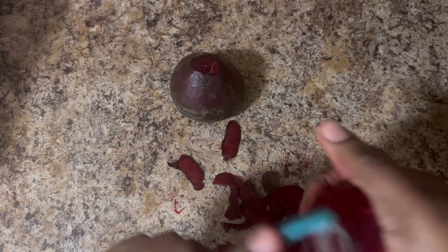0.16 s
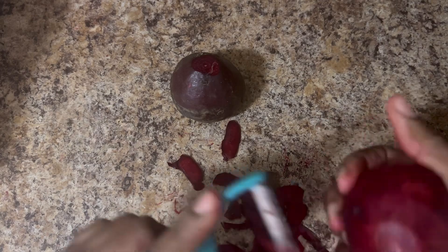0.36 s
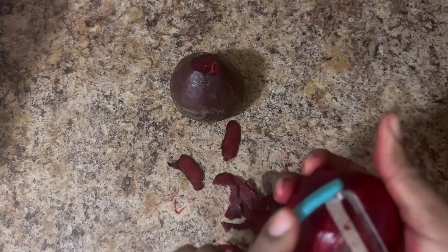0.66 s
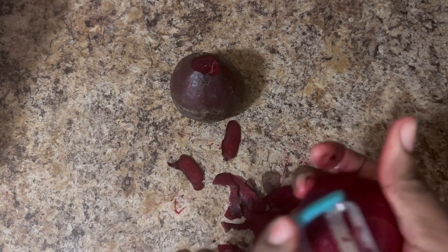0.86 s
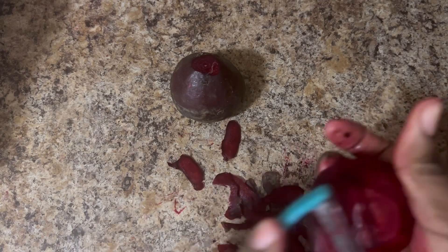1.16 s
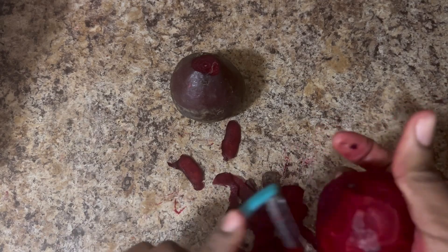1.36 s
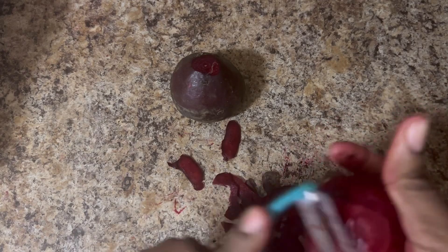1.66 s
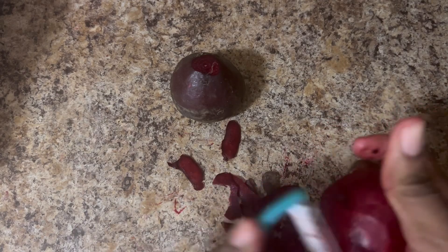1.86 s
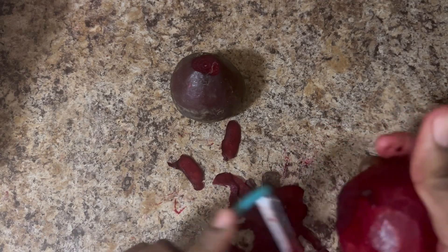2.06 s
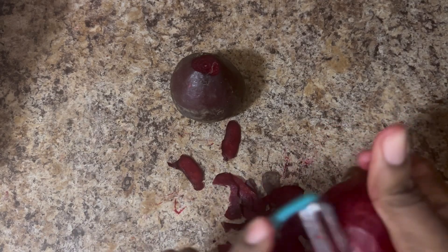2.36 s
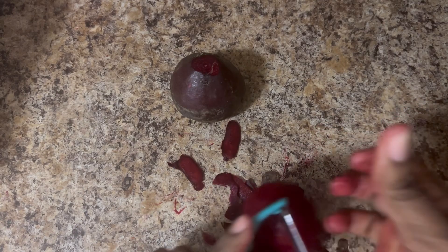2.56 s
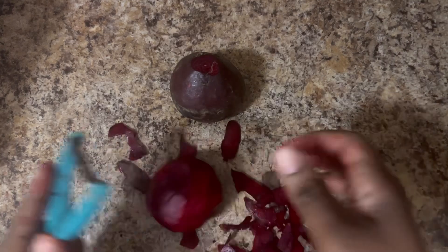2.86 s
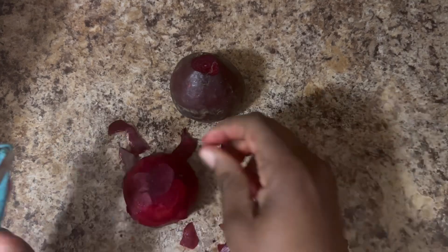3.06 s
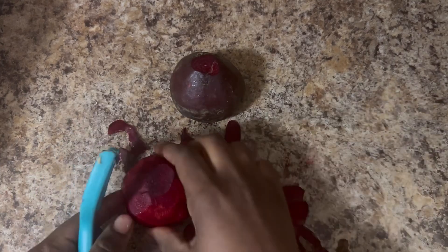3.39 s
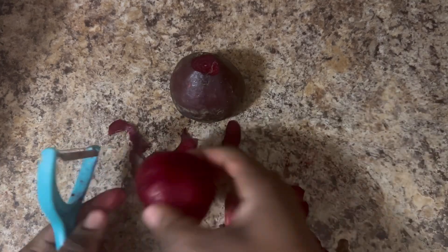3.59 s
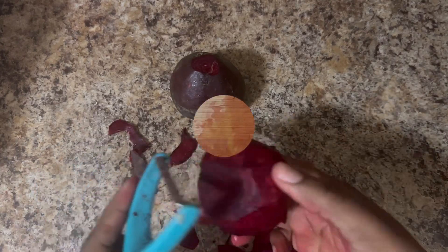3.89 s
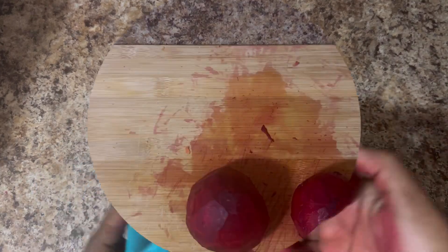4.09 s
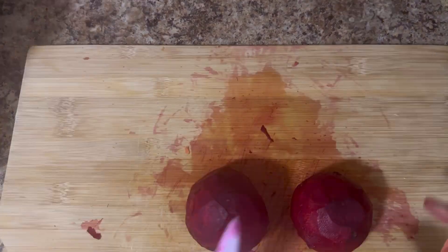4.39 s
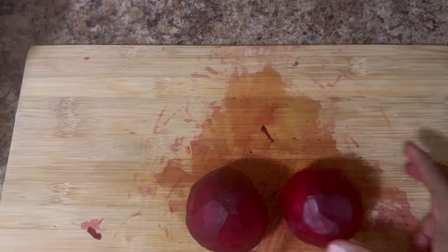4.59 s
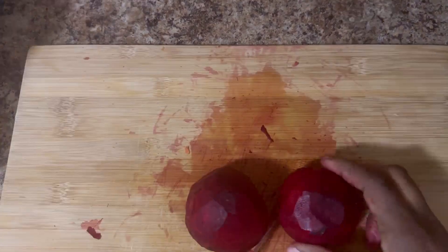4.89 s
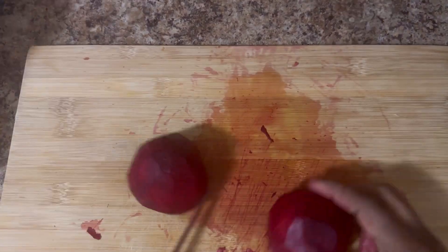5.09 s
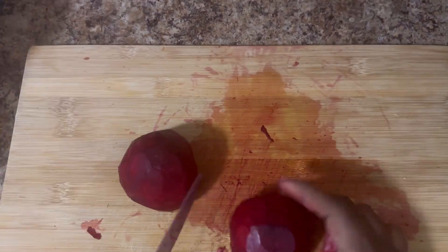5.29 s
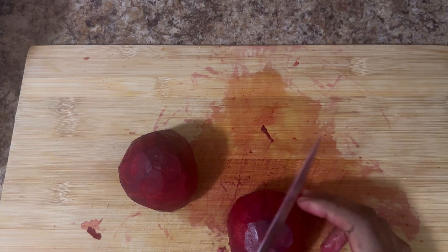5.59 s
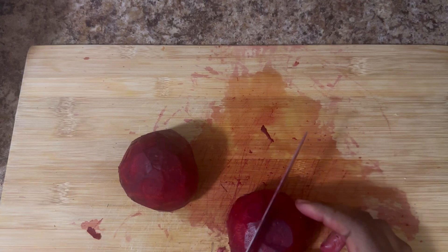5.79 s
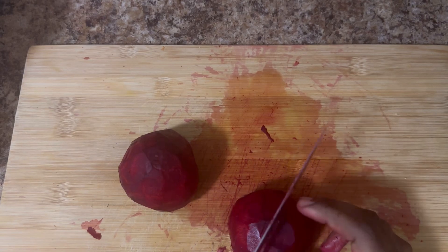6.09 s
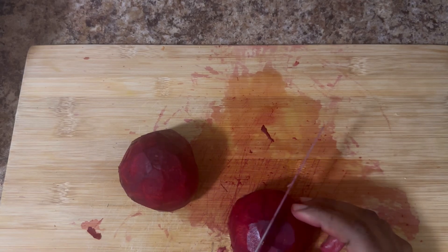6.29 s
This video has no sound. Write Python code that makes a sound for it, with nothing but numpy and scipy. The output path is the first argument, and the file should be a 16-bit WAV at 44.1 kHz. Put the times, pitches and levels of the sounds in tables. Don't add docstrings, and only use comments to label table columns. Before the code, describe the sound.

A peeler clicks and rasps through a raw beetroot, the root thumps and rolls on a stone counter, then a knife knocks on a wooden board.

```python
import sys
import numpy as np
from scipy import signal
from scipy.fft import rfft, irfft, next_fast_len
from scipy.io import wavfile
from scipy.ndimage import uniform_filter1d, map_coordinates

SR = 44100
rng = np.random.default_rng(int(sys.argv[2]) if len(sys.argv) > 2 else 0)


def linear_from_db(decibels):
    return 10 ** (np.asarray(decibels, float) / 20)


def master_out(mix):
    frames = np.transpose(np.atleast_2d(mix))
    ceiling = np.clip(frames, -1, 1)
    pcm = np.round(ceiling * 32767).astype(np.int16)
    wavfile.write(sys.argv[1], SR, pcm)


N = 284445
TIME = np.arange(N) / SR
AIR_HZ = 11040

# f/Hz, width/Hz, level/dB
BLADE = [(3132, 47, 8.5), (4220, 130, 5.5), (5700, 220, 8.5), (6220, 540, 5), (7100, 110, 1.5),
         (7740, 1100, 9.5)]
# f/Hz, level/dB
FAR_SIDE = [(60, -32.5), (110, -64), (200, -27.5), (380, -6.5), (700, -1), (1290, -34), (2380, -4.5),
            (4400, -4.5), (8120, -5), (15000, 11)]


def peeling():
    # bite t/s, glide before it/s, cut length/s, cut level/dB, glide level/dB
    strokes = [
        (0.177, .064, 0.026, -35.5, -69),
        (0.901, .035, 0.045, -33.5, -64),
        (1.287, 0.051, 0.07, -38, -56.5),
        (1.668, 0.029, 0.043, -35, -48),
        (1.988, 0.045, 0.038, -35.5, -56),
        (2.364, 0.054, 0.023, -34, -52.5),
        (2.438, 0.03, 0.019, -52, -69),
    ]
    # f/Hz, level/dB per Hz
    skin = [(350, -31), (600, -2.5), (905, -10), (1950, -11.5), (2740, -5.5), (4500, -9), (6300, -6.5),
            (7500, -10.5), (9600, -11), (10400, -21), (11000, -33), (13400, -26), (14300, -15),
            (15500, -10.5)]
    return gain([stroke(*row) for row in strokes]) * grit(skin, BLADE, rough_db=1.5, rate_hz=900, patch_db=3.5)


def stroke(bite_s, glide_s, cut_s, cut_db, glide_db):
    land_db, settle_s = -1, 0.018
    rise_s, bite_db, crest, leave_db = 0.0058, -4.5, 0.52, -7
    lift_s, after_db, after_s = 0.0088, -29.5, 0.07
    land_s, end_s = bite_s - glide_s, bite_s + cut_s
    return [(land_s, glide_db + land_db),
            (land_s + settle_s, glide_db),
            (bite_s - rise_s, glide_db),
            (bite_s, cut_db + bite_db),
            (bite_s + crest * cut_s, cut_db),
            (end_s, cut_db + leave_db),
            (end_s + lift_s, cut_db + after_db),
            (end_s + after_s, cut_db + after_db - 5)]


def clicks():
    # handle knock/dB, steel edge/dB, first touch/dB
    contacts = [(0.1014, -20.5, -11, 0.5, -26), (0.5901, -61, 24.5, -15, -32), (1.1075, -54, 4, -4, -28),
                (1.2069, -25.5, -8, 6, -20.5), (1.5594, -69, 23, -13, -35), (1.6146, -19, -7, 2, -21),
                (1.944, -21.5, -8, 4.5, -29), (2.311, -18.5, -9, 0.5, -31),
                (2.4404, -60.5, -9.5, 18.5, -31), (2.5033, -47, -17, -9, -28), (2.5974, -34, -12, 5.5, -31),
                (2.7185, -46.5, 18.5, -2, -31.5), (4.7651, -38, 0, 3, -18), (4.828, -58, 10, -3, -28),
                (5.8041, -51.5, 11, 3, -23), (6.1554, -52, 5, 8.5, -37), (6.344, -48, 4, 0, -28)]
    # f/Hz, level/dB per Hz
    snap_spectrum = [(710, -53), (1200, -11.5), (2920, -1), (3800, -4), (4380, 7), (5100, 0.5), (5820, 4.5),
                     (9330, -2), (10900, -16), (14900, -4), (16500, -25), (17000, -72.5)]
    air_db, air_t60_s = -15.5, 0.017
    force = np.zeros((4, N))
    t = TIME[:SR // 10]
    late = np.maximum(t - 0.006, 0)
    crack_and_chatter = linear_from_db(-60 * late / 0.0073) + linear_from_db(-10.5 - 60 * late / 0.047)
    blow = (1 - np.exp(-(late / 0.0012) ** 2)) * crack_and_chatter
    air_blow = (1 - np.exp(-(late / 0.00015) ** 2)) * linear_from_db(-60 * late / air_t60_s)
    blow = np.array([blow, blow, blow, air_blow])
    touch = t / 0.0048 * linear_from_db(-60 * late / 0.0016) * linear_from_db(np.array([[9], [-1], [-13], [-18]]))

    chips = rng.standard_normal((len(contacts), 4, len(t)))
    chips = chips + 7 * np.exp(-((late - 0.001) * SR) ** 2)
    chips = chips + 9 * np.exp(-((late - 0.0004) * SR) ** 2)
    for (s, db, knock_db, edge_db, touch_db), grain in zip(contacts, chips):
        at = round((s - 0.0064) * SR)
        level = linear_from_db(db + np.array([[knock_db], [0], [edge_db], [0]]))
        force[:, at:at + len(t)] = level * (blow + linear_from_db(touch_db) * touch) * grain

    snap = colour(snap_spectrum, BLADE, share=0.38)
    upper = lambda f: 1 / (1 + (4000 / (f + 1)) ** 12)
    air = lambda f: 1 / (1 + (AIR_HZ / (f + 1)) ** 24)
    parts = [colour([(200, -16), (400, 1.5), (650, 10), (1200, -10.5), (2200, -31.0)]),
             lambda f: snap(f) * (1 - upper(f)),
             lambda f: snap(f) * upper(f) * (1 - air(f)),
             lambda f: snap(f) * air(f)]
    return sum(linear_from_db(db) * filtered(x, causal(part)) / unit_gain(part)
               for x, part, db in zip(force, parts, (3, 1.5, 1.4, air_db)))


def root_on_counter():
    # t/s, root thump/dB, slab ring/dB, step to each higher mode group/dB, thump f/Hz
    bounces = [(2.5978, -1, -5, -1, 120.3), (2.627, -11, -16, -18, 97), (2.675, -14, -20.5, -10, 103),
               (2.712, -31, -32, 3.5, 111), (2.72, -3.5, -11.5, -5, 111), (2.756, -3.5, -17.5, 0.5, 94),
               (2.77, -3.5, -10.5, -4, 95.6), (2.794, -7.5, -30, 2, 100), (2.812, -22, -19.5, -9.5, 125),
               (2.892, -4.5, -10.5, -3.5, 124.7), (2.924, -25.5, -14.5, -8.5, 96),
               (2.954, -8, -18, -5.5, 131), (2.963, -8.5, -22, -8, 92.4), (2.992, -9.5, -14, -9, 102.4),
               (3.014, -10, -29.5, 1.5, 94.8), (3.034, -33, -30, -21, 98), (3.081, -40, -30, -16, 103),
               (3.119, -44, -42, -6, 87.5), (3.44, -27, -41, -6, 117), (3.479, -55, -40, -4, 129)]
    # f/Hz, level/dB, t60/s, group (rounded: 0 thump, 1 ring, 2 and 3 a step up each)
    counter = [(56, -4, 0.24, 1.5), (97, -6, 0.16, 1), (179.7, 0.5, 0.17, 1), (199, -4.5, 0.13, 2),
               (252, -11, 0.14, 2), (299.5, 0.5, 0.1, 2), (321, -4, 0.036, 2), (423, 4.5, 0.042, 3),
               (501, -7.5, 0.052, 3), (604, -11.5, 0.036, 3), (825, -30.5, 0.062, 3)]
    return linear_from_db(3.0) * thuds(bounces, counter, soft_s=0.0024, low_t60_s=0.11, lag_s=-0.00342, spread_s=0.003)


def knocks_on_board():
    # t/s, low thump/dB, board ring/dB, step to each higher mode
    # group/dB, thump f/Hz
    knocks = [(1.31, -33, -66, -15, 60), (1.6, -30, -67, -5, 55.4), (4.533, -53, -31, -6.5, 59.2),
              (4.547, -22.5, -29, -3, 66), (4.575, -38, -36.5, 1, 63.6), (4.609, -26.5, -35.5, -2, 113),
              (4.673, -22, -30.5, -6, 99), (4.769, -27, -62, 2, 92), (4.948, -22, -73, 2, 89),
              (4.984, -24.5, -56, -14, 73), (5.24, -16.5, -19, -15.5, 114), (5.315, -28, -31, -10, 122),
              (5.619, -45, -43.5, -1, 88.8), (5.678, -22.5, -31, -20, 97), (5.713, -27, -40, -18, 79),
              (5.81, -18, -24, -8, 99.5), (5.869, -29, -33.5, -15, 61.5), (6.161, -19.5, -22.5, -7, 118),
              (6.217, -24.5, -46, -5, 61), (6.349, -18, -20, -7.5, 117.6), (6.409, -29, -38, -10, 56.8)]
    # f/Hz, level/dB, t60/s, group (rounded: 0 thump, 1 ring, 2 and 3 a step up each)
    board = [(44, -2.5, 0.23, 1.5), (142, -3.5, 0.085, 0.33), (189.6, 0.5, 0.13, 1),
             (232.7, -5.5, 0.096, 1), (280.7, -5, 0.18, 2), (405.4, 6, 0.065, 3), (568, 3.5, 0.026, 3)]
    return linear_from_db(6.0) * thuds(knocks, board, soft_s=0.0067, low_t60_s=0.099, lag_s=-0.0018, spread_s=0.0021)


def thuds(events, modes, soft_s, low_t60_s, lag_s, spread_s):
    out, t = np.zeros(N + SR), TIME[:SR // 2]
    luck = rng.standard_normal((len(events), len(modes), 2))

    def tone(hz, detune=1.0):
        since = np.maximum(t - spread_s * np.sqrt(150 / hz), 0)
        swell = 1 - np.exp(-(since / soft_s) ** 2 * hz / 150)
        return swell * np.sin(2 * np.pi * hz * detune * since)

    for (s, low_db, ring_db, step_db, low_hz), draws in zip(events, luck):
        levels = [low_db, ring_db, ring_db + step_db, ring_db + 2 * step_db]
        hit = linear_from_db(low_db - 60 * t / low_t60_s) * tone(low_hz)
        for (hz, db, t60, group), (a, b) in zip(modes, draws):
            mode_db = levels[int(round(group))] + db + 1.48 * a
            hit = hit + linear_from_db(mode_db - 60 * t / t60) * tone(hz, 1 + 0.011 * b)
        out[round((s + lag_s) * SR):][:len(t)] -= hit
    return out[:N]


def rattle():
    # t/s, level/dB
    shakes = [(2.6, -52), (2.613, -56), (2.632, -63), (2.679, -53), (2.72, -55), (2.864, -56),
              (2.887, -54.5), (2.912, -58), (2.954, -56), (2.985, -63), (4.543, -50), (4.592, -50),
              (5.146, -67)]
    # f/Hz, level/dB, t60/s
    steel = [(2090, 3, .07), (3300, -6.5, .06), (4450, -4, 0.028), (4500, -4.5, 0.064), (5600, -6, .05),
             (6040, -18, .07), (6450, -6.5, .09), (6900, -7.5, 0.082), (8100, -6, .06)]
    out, t = np.zeros(N), TIME[:SR // 8]
    luck = rng.standard_normal((len(shakes), len(steel), 2))
    onset = 1 - np.exp(-t / 0.0012)
    for (s, db), draws in zip(shakes, luck):
        for (hz, level, t60), (a, b) in zip(steel, draws):
            decay = linear_from_db(db + level + 3.6 * a - 60 * t / t60)
            out[round(s * SR):][:len(t)] += onset * decay * np.sin(2 * np.pi * hz * (1 + 0.0036 * b) * t)
    return out


def pings():
    # t/s, f/Hz, level/dB, t60/s
    tones = [(.588, 6340, -55, 0.11), (2.501, 4090, -49.5, 0.32), (2.52, 6000, -57, .1),
             (2.863, 1930, -32, 0.014), (2.616, 1800, -34, .02), (2.629, 1980, -27, 0.024),
             (2.629, 3300, -35, .012), (.2, 6350, -66, .35), (.945, 6500, -58, .15),
             (1.345, 6360, -67, .15), (4.977, 2010, -48, 0.17), (4.977, 1490, -52, 0.13),
             (4.977, 3450, -49, 0.13), (4.977, 4480, -47.5, 0.11), (4.977, 6570, -48, 0.072),
             (5.144, 4400, -53, .07), (5.17, 4330, -66, .08), (5.195, 4220, -64, .08),
             (4.995, 3480, -60, 0.44)]
    out, t = np.zeros(N), TIME[:SR // 2]
    shake_rad = 0.5 * wobble(120)
    onset = 1 - np.exp(-t / 0.0013)
    for s, hz, db, t60 in tones:
        span = slice(round(s * SR), round(s * SR) + len(t))
        out[span] += linear_from_db(db - 60 * t / t60) * np.sin(2 * np.pi * hz * t + shake_rad[span]) * onset
    return out


def handling():
    # t/s, t60/s, slap level/dB, rustle level/dB
    brushes = [(.3, 0.29, -63.5, -74), (.412, 0.31, -63, -75), (.528, .3, -74, -76),
               (.589, 0.48, -51, -64.5), (.748, 0.044, -54, -72), (1.08, .05, -80, -80),
               (1.109, 0.33, -54.5, -74), (2.5, .15, -57.5, -69), (2.55, 0.13, -71, -69),
               (2.602, 0.048, -21, -36), (2.612, .1, -39, -58), (2.628, 0.19, -33.5, -51),
               (2.717, 0.21, -45.5, -57), (2.761, 0.51, -50, -79), (2.866, 0.96, -54, -62),
               (3.088, 0.49, -72, -59.5), (3.294, 0.64, -60, -88), (3.342, 0.09, -76, -59),
               (3.49, 0.68, -58, -88), (3.644, 0.81, -60.5, -62.5), (3.8, 0.18, -68, -66),
               (4.543, 0.51, -42.5, -53), (4.592, 0.25, -61, -53.5), (4.828, 0.078, -57, -72),
               (4.974, 0.22, -49.5, -51.5), (5.005, 0.23, -60, -71), (5.04, 0.51, -57, -70),
               (5.1, 0.22, -64, -65), (5.195, .12, -59, -73), (5.241, 0.053, -54.5, -72)]
    # f/Hz, level/dB per Hz
    slap_spectrum = [(250, -14), (450, 0), (700, 9.5), (1050, 4.5), (1300, 2.5), (1800, -4), (2500, -8),
                     (4000, -41)]
    # f/Hz, level/dB per Hz
    rustle_spectrum = [(1500, -12), (2500, 4), (4500, 2), (6500, -3.5), (9000, -10), (10500, -24),
                       (13500, -48), (15000, -24), (15800, -28), (16100, -60.5)]
    swell_s, swell_db = 0.012, -20.5
    brush = lambda s, t60, db: [(s - swell_s, db + swell_db), (s, db), (s + t60 / 2, db - 60 / 2)]
    slap = gain([brush(s, t60, db) for s, t60, db, _ in brushes])
    slap = slap * grit(slap_spectrum, (), rough_db=3.5, rate_hz=180, patch_db=0.0)
    rustle = gain([brush(s, t60, db) for s, t60, _, db in brushes])
    rustle = rustle * grit(rustle_spectrum, BLADE, rough_db=-0.5, rate_hz=170, patch_db=1.5)
    return slap + rustle


def knife_slide():
    # t/s, level/dB
    slide = [(4.34, -72), (4.41, -58.5), (4.48, -55), (4.53, -56), (4.58, -55), (4.65, -61)]
    # f/Hz, width/Hz, level/dB
    slide_tones = [(3200, 90, -16), (3560, 120, -7), (4080, 99, -18), (4270, 120, -17), (3800, 2400, -19)]
    sag = 0.025
    sing = lambda f: sum(linear_from_db(db) / (1 + (2 * (f - hz) / width) ** 2) for hz, width, db in slide_tones)
    drawn = patchy(1, wide=3, long=12)
    fast, slow = unit(filtered(drawn, lambda f: [sing(f / (1 + sag / 2)), sing(f * (1 + sag / 2))]))
    late = np.interp(TIME, [slide[0][0], slide[-2][0]], [0, 1])
    return gain([slide]) * ((1 - late) * fast + late * slow)


def rubbing():
    # t/s, length/s, level/dB
    rubs = [(0.0, .09, -72), (.22, 0.22, -69.5), (2.38, .2, -62.5), (2.6, .07, -55), (2.675, 0.34, -64),
            (3.31, 0.059, -76.5), (3.602, 0.11, -68), (3.994, 0.19, -72.5), (4.172, 0.34, -66.5),
            (4.528, .06, -70), (4.65, .25, -69), (4.92, 0.33, -64.5), (5.352, 0.11, -74)]
    # f/Hz, level/dB per Hz
    fine = [(4000, -31), (6500, 7), (9000, -3), (10300, -9), (11500, -28.5), (13500, -20), (14800, -8.5),
            (15800, -4.5)]
    swells = [[(s, db - 4), (s + 0.3 * long, db), (s + 0.8 * long, db + 3), (s + long, db - 14.5)]
              for s, long, db in rubs]
    return gain(swells) * grit(fine, (), rough_db=3.5, rate_hz=60, patch_db=5.0)


def ports(x):
    # f/Hz, level/dB
    near_side = [(60, -66.5), (200, -22), (380, -11), (700, -14.5), (1300, -10), (1900, -22.5), (2500, -10),
                 (4500, -8.5), (6000, -9.5), (7000, -5.5), (9300, 4.5), (10800, 10), (13300, 11),
                 (14800, 2)]
    # f/Hz, turn/rad
    near_turn = [(125, 1.4), (300, 1.2), (700, 1.3), (1300, 1.6), (2500, 1.3), (5000, 1.53), (9000, 1.57),
                 (14000, 1.65)]
    return filtered(x, lambda f: [np.ones_like(f), np.exp(1j * along(near_turn, f)) * linear_from_db(along(near_side, f))])


def kitchen(x):
    # f/Hz, t60/s
    decay = [(100, 0.61), (1000, 0.27), (4000, 0.32), (12000, 0.18)]
    hz, t, z = signal.stft(rng.standard_normal((2, SR // 2)), SR, nperseg=256)
    tail = signal.istft(z * linear_from_db(-60 * t / along(decay, hz)[:, None]), SR, nperseg=256)[1]
    delayed = np.pad(x, (250, 0))[None]
    wet = signal.fftconvolve(delayed, tail / np.linalg.norm(tail[0]), axes=1)[:, :N]
    return filtered(wet, lambda f: (f < AIR_HZ) * np.array([np.ones_like(f), linear_from_db(along(FAR_SIDE, f))]))


def room_tone():
    # t/s, level/dB
    loudness = [(0.0, -40), (1.8, -40), (2.3, -42), (2.87, -36), (3.11, -39.5), (4.11, -43), (4.51, -41.5),
                (5.15, -39.5), (6.09, -39.5), (6.45, -38)]
    # f/Hz, level/dB per Hz
    hum_spectrum = [(13, -43), (26, -18), (36, -7.5), (54, -3), (87, -7.5), (167, -5), (240, -7),
                    (278, -21.5), (317, -2.5), (344, -8), (1100, -36.5), (1430, -61), (2420, -120)]
    # f/Hz, width/Hz, level/dB
    hum_peaks = [(56.4, 15, 7), (167.2, 13, 9.5), (250.6, 47, 7.5), (310, 7.7, 2.5), (406.4, 9, 11),
                 (475, 12, 3), (645.5, 43, 7.5), (847.6, 46, 12.5)]
    # f/Hz, level/dB per Hz
    hiss_sum = [(530, -13.5), (900, 0.5), (1420, -5), (1770, -2), (2270, -2), (3590, -8), (5890, -7.5),
                (9420, -16.5), (10200, -40), (10900, -49), (13500, -37), (14900, -29), (15600, -26)]
    # f/Hz, level/dB per Hz
    hiss_side = [(530, -21.5), (900, 8.5), (1090, 4), (1390, -5), (1490, -7.5), (1940, -9.5), (2620, 1.5),
                 (3790, -6), (4760, -1), (6060, -9.5), (9210, -4.5), (10900, -32), (15800, -6.5)]
    # f/Hz, width/Hz, level/dB
    hiss_peaks = [(1050, 35, 4), (1290, 58, 3.1), (1447, 61, 8.9), (2135, 120, 2.6)]
    hiss_db, hiss_follows = -60, 0.28

    hum_colour = colour(hum_spectrum, hum_peaks)
    hum = filtered(rng.standard_normal((2, N)),
                   lambda f: hum_colour(f) * [np.ones_like(f), linear_from_db(along(FAR_SIDE, f))])
    hiss = np.array([unit(filtered(patchy(1.03, wide=4, long=30), colour(shape, hiss_peaks)))
                     for shape in (hiss_sum, hiss_side)])
    swell = gain([loudness])
    hum_gain = swell * linear_from_db(0.8 * wobble(6))
    flutter = linear_from_db(0.7 * wobble(8.8))
    hiss_gain = unit(swell) ** hiss_follows * linear_from_db(hiss_db) * flutter
    return hum_gain * hum / np.std(hum[0]) + hiss_gain * hiss * linear_from_db([[0], [-3]])


def grit(spectrum, peaks, rough_db, rate_hz, patch_db):
    tearing = patchy(patch_db, wide=5, long=5) * linear_from_db(rough_db * wobble(rate_hz))
    return unit(filtered(tearing, colour(spectrum, peaks)))


def patchy(depth_db, wide, long):
    z = signal.stft(rng.standard_normal(N), nperseg=256)[2]
    field = uniform_filter1d(rng.standard_normal(z.shape), wide, 0)
    field = uniform_filter1d(field, long, 1)
    return signal.istft(z * linear_from_db(depth_db * unit(field)), nperseg=256)[1][:N]


def wobble(rate_hz):
    return map_coordinates(rng.standard_normal(int(N * rate_hz / SR) + 4), [TIME * rate_hz])


def gain(curves):
    out = np.zeros(N)
    for s, db in map(np.transpose, curves):
        span = slice(round(s[0] * SR), round(s[-1] * SR))
        out[span] += linear_from_db(np.interp(TIME[span], s, db))
    return out


def colour(spectrum, peaks=(), share=1.0):
    bumps = lambda f: sum(db / (1 + (2 * (f - hz) / width) ** 2) for hz, width, db in peaks)
    return lambda f: linear_from_db(along(spectrum, f) + share * bumps(f))


def causal(response):
    def turned(f):
        cepstrum = irfft(np.log(response(f) + 1e-6))
        cepstrum[1:len(f) - 1] *= 2
        cepstrum[len(f):] = 0
        return np.exp(rfft(cepstrum))
    return turned


def filtered(x, response):
    m = 2 * next_fast_len(N // 2 + 4096)
    return irfft(rfft(x, m) * response(np.fft.rfftfreq(m, 1 / SR)), m)[..., :N]


def unit_gain(response):
    return np.sqrt(np.mean(response(np.arange(SR // 2)) ** 2))


def unit(x):
    return x / np.sqrt(np.mean(x ** 2) + 1e-20)


def along(points, hz):
    f, v = np.transpose(points)
    return np.interp(np.log(hz + 1), np.log(f + 1), v)


def scene():
    top_hz = 15900
    sharp = clicks()
    soft = peeling() + root_on_counter() + knocks_on_board() + rattle()
    soft = soft + pings() + handling() + knife_slide() + rubbing()
    limited = ports(soft) + linear_from_db(-14.5) * kitchen(soft + sharp) + room_tone()
    mid, side = ports(sharp) + filtered(limited, lambda f: f < top_hz)
    return np.array([mid * linear_from_db(-1.66) + side, mid * linear_from_db(-1.76) - side])


def low_pass(x):
    return signal.sosfilt(signal.butter(12, 17040, fs=SR, output="sos"), x)


def record(dry):
    x = filtered(dry, causal(lambda f: f ** 3 / (f ** 3 + 34 ** 3)))
    x = x / (1 + np.abs(x / 0.97) ** 6) ** (1 / 6)
    return low_pass(x)


dry = scene()
out = record(dry)
master_out(out)
```